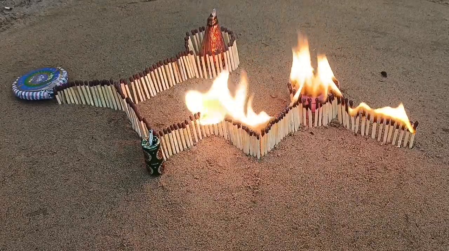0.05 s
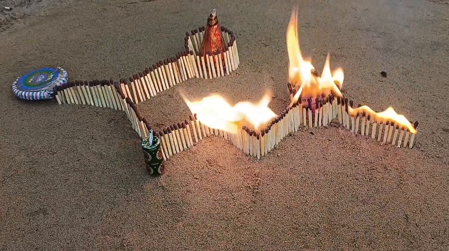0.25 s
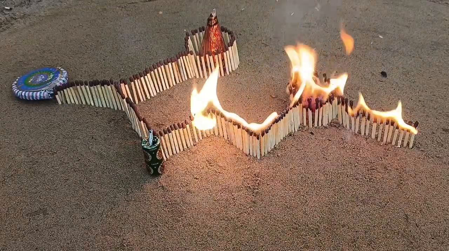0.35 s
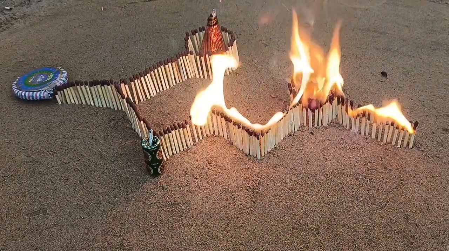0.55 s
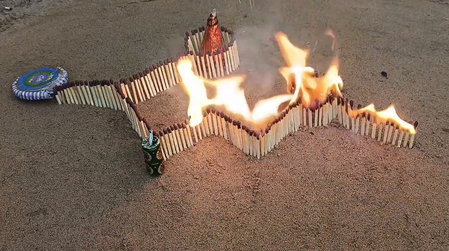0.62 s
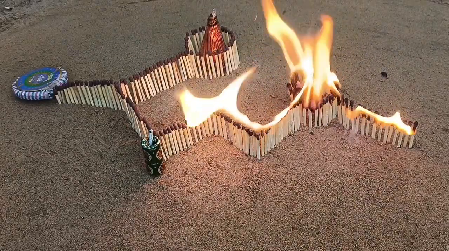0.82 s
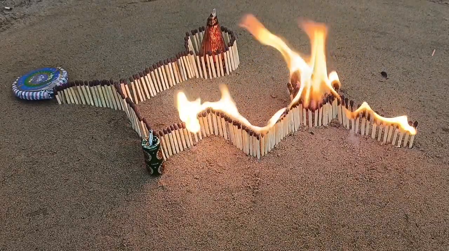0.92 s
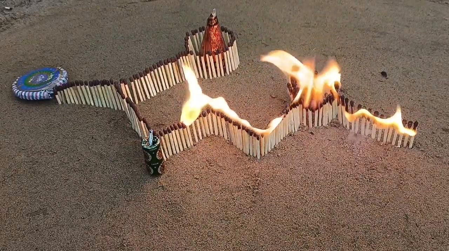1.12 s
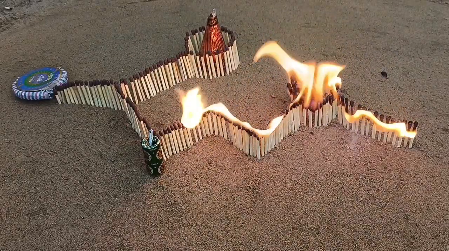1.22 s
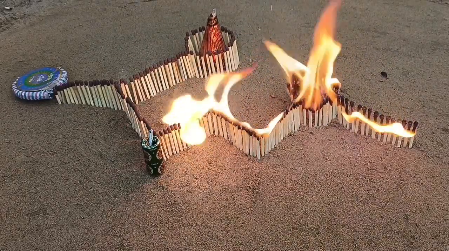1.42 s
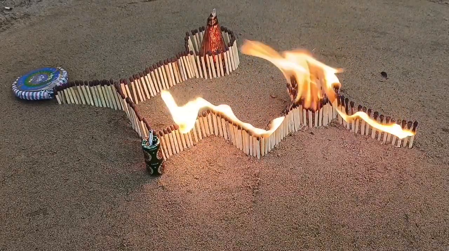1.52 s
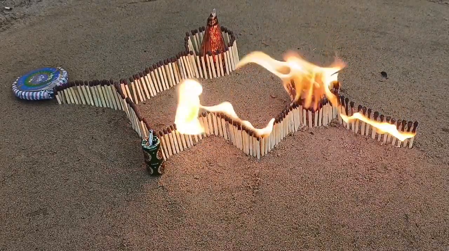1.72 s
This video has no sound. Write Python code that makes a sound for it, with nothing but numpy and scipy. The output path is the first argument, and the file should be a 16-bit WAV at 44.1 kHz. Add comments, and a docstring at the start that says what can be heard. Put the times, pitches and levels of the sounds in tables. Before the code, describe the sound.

Sharp cracking pops from burning matchsticks echo briefly in a yard above quiet flame hiss

```python
"""Rows of matchsticks burn on hard ground in a walled yard, over 1.75 seconds.
From the start, flames flutter (low noise, short puffs) and heads hiss on the right (noise that swells and fades).
Five pops come between 0.2 and 0.7 s: each is a crack with quick reflections, a sizzle, a thump and a low boom.
Each pop also bounces off the ground and sets off noise echoes and hollow tones in the yard.
Faint whistles (wavering tones) come from 0.55 s on; a last pop comes at 1.4 s, then flames and hiss go on."""
import sys
import numpy as np
from scipy import signal
from scipy.fft import rfft, irfft
from scipy.io import wavfile
from scipy.ndimage import uniform_filter1d

SR = 44100
rng = np.random.default_rng(int(sys.argv[2]) if len(sys.argv) > 2 else 0)


def convert_level_to_amplitude(level_db):
    """Map a level in decibels to its linear amplitude factor."""
    exponent = np.asarray(level_db, float) / 20
    return 10 ** exponent


def transcribe(signal):
    """Save signal, clipped to [-1, 1], as a 16-bit WAV file at the path in sys.argv[1]."""
    frames = np.atleast_2d(signal).T
    limited = np.clip(frames, -1, 1)
    pcm = np.round(limited * 32767).astype(np.int16)
    wavfile.write(sys.argv[1], SR, pcm)


N = 77175  # samples in the scene
LEFT_RIGHT = np.array([[1], [-1]])


def sides(pan_db):
    """Gains for left and right that differ by pan_db; a positive pan leans left."""
    return convert_level_to_amplitude(LEFT_RIGHT * pan_db / 2)


def unit(x):
    """Scale to an rms of 1."""
    return x / np.sqrt(np.mean(x ** 2))


def colour(x, points):
    """Filter with the given (Hz, dB) shape; it never sounds ahead of its input and has unit energy."""
    hz_points, db_points = np.array(points, float).T
    hz = np.maximum(np.arange(1025) * SR / 2048, 1)
    log_gain = np.interp(np.log(hz), np.log(hz_points), db_points) * np.log(10) / 20
    # fold the cepstrum forward in time: this gives the minimum-phase filter
    cepstrum = irfft(log_gain)
    cepstrum[1:1024] *= 2
    cepstrum[1025:] = 0
    h = irfft(np.exp(rfft(cepstrum)))[:1024]
    h = h / np.sqrt(np.sum(h ** 2))
    h = h.reshape((1,) * (x.ndim - 1) + (-1,))
    return signal.fftconvolve(x, h, axes=-1)[..., :x.shape[-1]]


def band(x, hz, width_hz):
    """Keep only a band of pitches around hz."""
    edges_hz = [hz - width_hz / 2, min(hz + width_hz / 2, .49 * SR)]
    return signal.sosfilt(signal.butter(2, edges_hz, "band", fs=SR, output="sos"), x)


def walk(rate):
    """A wandering random curve: values held for 1 / rate seconds, then smoothed twice."""
    k = int(SR / rate)
    steps = np.repeat(rng.standard_normal(200), k)[:N]
    return 1.3 * uniform_filter1d(uniform_filter1d(steps, k), k)


def fade(age, t60):
    """Steady dying away, by 60 dB in t60 seconds."""
    return np.exp(-np.log(1000) * age / t60)


def ring(age, hz, t60):
    """A dying sine that starts at age 0."""
    a = np.maximum(age, 0)
    return np.sin(2 * np.pi * hz * a) * fade(a, t60)


def late(x, ms):
    """Delay by ms milliseconds."""
    return np.roll(x, int(ms * SR / 1000), axis=-1)


USUAL_FLARE_DB = -54.5  # treble level that counts as a usual flare
FLUTTER_DB, FLUTTER_HZ, FLUTTER_WIDTH_HZ = -70, 85, 150  # rumble level at a usual flare, before it wanders
FLUTTER_FOLLOWS = .4  # dB of rumble per dB of flare
# puffs of the flames: start_s (the loudest moment), pitch_hz, level_db, length_s (from the peak to 1/e)
PUFFS = [(0.172, 78.6, -54, .025), (.6, 182, -53, 0.0093), (0.793, 85, -53, 0.022),
         (.936, 80.2, -50.5, 0.0077), (1.0, 90, -59, .012), (1.318, 78, -54.5, 0.03),
         (1.535, 79, -47.5, 0.011), (1.592, 95, -52.5, 0.011), (1.61, 105, -55, 0.0052),
         (1.636, 105, -51, 0.0069), (1.718, 99, -52, 0.0097)]
# faint short whistles: start_s (the loudest moment), pitch_hz, level_db, length_s (from the peak to 1/e)
WHISTLES = [(.555, 883, -61, 0.019), (.95, 1398, -68, .03), (1.01, 2356, -69, 0.026),
            (1.095, 1308, -62, 0.027), (1.115, 580, -61, 0.013), (1.3, 1913, -59, 0.016),
            (1.625, 1080, -58, 0.019), (1.655, 1315, -69, 0.026)]


def flutter():
    """Flames: low noise that follows the flare, nearly alike on both sides, with puffs and wavering whistles."""
    t = np.arange(N) / SR
    mid, side = band(rng.standard_normal((2, N)), FLUTTER_HZ, FLUTTER_WIDTH_HZ)
    rumble = unit(mid + .3 * side * LEFT_RIGHT)
    flare_db = np.interp(t, *np.array(FLARE)[:, :2].T)
    rumble_db = FLUTTER_DB + 3.0 * walk(30) + FLUTTER_FOLLOWS * (flare_db - USUAL_FLARE_DB)
    out = convert_level_to_amplitude(rumble_db) * rumble
    for table, waver in ((PUFFS, .4), (WHISTLES, 1.1)):
        for s, hz, db, length in table:
            swell = convert_level_to_amplitude(db + 2 * waver * walk(90)) * np.exp(-((t - s) / length) ** 2)
            out += swell * np.cos(2 * np.pi * hz * (t - s) + waver * walk(90))
    return out


# flaring heads: start_s, treble_db, middle_db (both before a 4.5 dB lift), pan_db (left over right)
FLARE = [(0, -66.5, -74.5, -1), (0.114, -62.5, -71.5, -9), (.19, -67.5, -76, -4), (0.298, -55.5, -62, -5.5),
         (0.359, -58, -51, -3), (.45, -67.5, -100, -7), (0.551, -60, -64, 0), (.63, -57, -75.5, -6),
         (.72, -71.5, -61, -10), (.814, -72, -82, -8), (.856, -57, -68.5, -5), (.886, -57, -68.5, -8),
         (.944, -64, -70, -4), (.988, -61.5, -69, -3.5), (1.09, -73.5, -70, -1),
         (1.116, -65.5, -68.5, -3.5), (1.164, -76.5, -82.5, -4.5), (1.246, -57.5, -67.5, -8.5),
         (1.305, -58.5, -65.5, -7), (1.355, -62, -78, -12), (1.411, -63.5, -66.5, -9),
         (1.472, -52.5, -65, -10), (1.506, -53.5, -47, -6), (1.58, -68.5, -64, -3.5),
         (1.637, -68.5, -75, -10), (1.686, -77.5, -73, -1), (1.72, -70.5, -72, -1.5),
         (1.75, -84, -77, -3.5)]
# tone of the treble hiss: pitch_hz, level_db (per Hz, relative)
TREBLE = [(2590, -46), (4400, -24), (5010, -1.5), (5550, -1), (6150, -6.5), (8780, -6.5), (9530, -13.5),
          (10800, -13.5), (11700, -5), (12300, -9), (14900, -20.5), (15400, -24.5), (16000, -29)]
# tone of the middle hiss: pitch_hz, level_db (per Hz, relative)
MIDDLE = [(120, -39.5), (200, -18), (363, -13), (710, -16), (1470, -8.5), (1670, -17.5), (1920, -8),
          (2910, -10), (3350, -29), (3670, -12), (4400, -43), (5720, -41.5), (9680, -120)]
# slow and quick wavering heard in narrow bands, each (treble dB, middle dB) per unit of walk()
SLOW_WAVER_DB, QUICK_WAVER_DB = (.8, 2.5), (1.5, 2.5)
SLOW_PER_S, QUICK_PER_S = 13, 80
BRIGHTEN, BRIGHT_HZ = .4, 9100  # dB per octave above BRIGHT_HZ for each dB over the usual flare


def flare():
    """Hiss of igniting heads: noise swells and fades, brighter on top when strong; narrow bands waver in it."""
    t, out = np.arange(N) / SR, 0
    start_s, treble_db, middle_db, pan_db = np.array(FLARE, float).T
    for points, levels, slow_db, quick_db in ((TREBLE, treble_db, SLOW_WAVER_DB[0], QUICK_WAVER_DB[0]),
                                              (MIDDLE, middle_db, SLOW_WAVER_DB[1], QUICK_WAVER_DB[1])):
        noise = colour(rng.standard_normal((2, N)), points)
        db = np.interp(t, start_s, levels)
        low_hz, high_hz = points[1][0], points[-2][0]
        layer = 0
        for hz in low_hz * 2 ** np.arange(0, np.log2(high_hz / low_hz), 1 / 8):
            waver = slow_db * walk(SLOW_PER_S) + quick_db * walk(QUICK_PER_S)
            brighter = BRIGHTEN * (db - USUAL_FLARE_DB) * max(np.log2(hz / BRIGHT_HZ), 0)
            layer = layer + band(noise, hz, hz / 10.3) * convert_level_to_amplitude(waver + brighter)
        out = out + unit(layer) * convert_level_to_amplitude(db + 4.5)
    return out * sides(np.interp(t, start_s, pan_db))


# yard echoes by band: pitch_hz, level_db (relative), t60_s (time to fade by 60 dB)
YARD = [(70, -29, 0.3), (190, -20.5, .27), (400, -8, .2), (620, -12.5, 0.1), (810, -21, 0.21),
        (1190, -13, 0.13), (1610, -14.5, 0.27), (2300, -5, 0.08), (3780, -15.5, 0.18), (5200, -17, 0.14),
        (9000, -11, 0.28), (15000, -23.5, .15)]
# hollow tones of the yard: pitch_hz, level_db (before scatter and the hold), t60_s (time to fade by 60 dB)
HOLLOWS = [(76, -62.5, 0.39), (101.25, -63.5, 0.32), (136.4, -65, .25), (187.6, -62.5, 0.12),
           (253.6, -54.5, .2), (297.8, -46.5, 0.17), (360.4, -49, 0.15), (430.2, -57, 0.14),
           (484, -47.5, 0.16), (544, -56, 0.18), (640, -60.5, 0.073)]
WALLS_S, SETTLE_S, EARLY_DB = .034, .014, 2.5  # fading starts; early extra level goes SETTLE_S before that
HOLLOW_SCATTER_DB, HOLLOW_RISE_S, HOLLOW_HOLD_S = -1, 0.0033, .025  # tones hold before they fade


def yard(x, start):
    """Dense noise echoes, stronger early, die band by band once the walls answer; hollow tones ring on."""
    t = np.arange(SR // 2) / SR
    band_hz, band_db, band_t60 = np.array(YARD, float).T
    settled = 1 / (1 + np.exp(-(t - WALLS_S + SETTLE_S) / (SETTLE_S / 3)))
    early = convert_level_to_amplitude(EARLY_DB) + (1 - convert_level_to_amplitude(EARLY_DB)) * settled
    echo = 0
    for hz in 60 * 2 ** np.arange(0, 8.1, 1 / 3):
        db = np.interp(np.log(hz), np.log(band_hz), band_db)
        t60 = np.interp(np.log(hz), np.log(band_hz), band_t60)
        mid, side = band(rng.standard_normal((2, len(t))), hz, hz / 4.3)
        pair = mid + min(hz / 1600.0, 1.2) * side * LEFT_RIGHT  # high echoes spread wider
        echo = echo + convert_level_to_amplitude(db) * pair * fade(np.maximum(t - WALLS_S, 0), t60)
    echo = echo * early * np.minimum(t / 0.0037, 1) ** 2 / np.sqrt(SR * WALLS_S)
    for (hz, db, t60), c in zip(HOLLOWS, rng.standard_normal((len(HOLLOWS), 3))):
        lag = .003 + (abs(c[0]) + .04 * c[1] * LEFT_RIGHT) / hz
        tone = convert_level_to_amplitude(db + HOLLOW_SCATTER_DB * c[2]) * ring(t - lag, hz, t60)
        # undo the fade during the hold, at the level of its middle
        hold = convert_level_to_amplitude(60 * (np.minimum(t, HOLLOW_HOLD_S) - HOLLOW_HOLD_S / 2) / t60)
        echo = echo + tone * (1 - np.exp(-t / HOLLOW_RISE_S)) * hold
    tail = signal.fftconvolve(x.mean(0)[None, start:start + SR // 8], echo, axes=-1)
    return np.pad(tail, ((0, 0), (start, N)))[:, :N]


# the first crack of a pop and its quick reflections: late_ms (before jitter), level_db (added to crack_db),
# pan_db (left over right, added to the pop's pan, before scatter)
ARRIVALS = [(0, 0.5, 12), (.6, -0.5, 7.5), (1.3, -3, 3.5), (2.0, 4.5, -5), (2.5, -8, -20), (2.9, 1, 10),
            (3.5, -1, -8.5)]
# tone of the crack and its reflections: pitch_hz, level_db (per Hz, relative)
CRACK_COLOUR = [(350, -44.5), (600, -0.5), (1260, -7), (2120, 1.5), (2990, -2.5), (4050, -2.5),
                (6920, -12.5), (7940, -17.5), (12300, -23), (13600, -40.5), (14900, -22.5), (16000, -39)]
CRACK_JITTER_MS, CRACK_T60_S, FIZZ_DB = 0.11, 0.0049, -7.5  # fizz is the noise after each click


def crack(s, crack_db, fade_db, pan_db):
    """A first crack and its quick reflections over 3.5 ms, each a click followed by dying noise."""
    arrivals = np.zeros((2, N))
    chance = rng.standard_normal((len(ARRIVALS), 2))
    chance[0] = 0  # the first crack is exactly on time and in place
    for (ms, db, lean_db), (jitter, lean_scatter) in zip(ARRIVALS, chance):
        fizz = rng.standard_normal(400) + .5 * rng.standard_normal((2, 400))
        click = fizz * convert_level_to_amplitude(FIZZ_DB) * fade(np.arange(400) / SR, CRACK_T60_S)
        click[:, 0] = 1
        i = int((s + (ms + CRACK_JITTER_MS * jitter) / 1000) * SR)
        size = convert_level_to_amplitude(crack_db + db + fade_db * ms)
        arrivals[:, i:i + 400] += sides(pan_db + lean_db + 2.5 * lean_scatter) * size * click
    return colour(arrivals, CRACK_COLOUR)


THUMP_CYCLES = 1.43  # cycles in which the thump fades by 30 dB
BOOM_HZ, BOOM_T60_S = 96.8, 0.05
GROUND_MS, GROUND_DB, SIDE_MS, SIDE_DB = 1.9, -7, 3.086, -6.5  # bounce off the ground; off something on the right
SIZZLE_HZ, SIZZLE_WIDTH_HZ, SIZZLE_S = 12850, 4300, 0.0052  # a spit of gas at the very top
# pops: start_s, crack_db, crack_fade_db_per_ms (added per ms late), sizzle_db, thump_db, thump_hz,
# boom_db, pan_db (left over right), sent_db (crack sent to the yard)
POPS = [(0.2259, -9.5, -3.5, -32.5, -11, 378, -17, -7, -0.5),
        (0.259, -9.5, -3.5, -28, -1.5, 530, -18.5, -1, -0.5),
        (.3860, -14.5, -1, -31, -15, 400, -17.5, -2.5, -3.5),
        (0.4723, -10.5, -1.96, -35, -13.5, 400, -19, -6.5, 3),
        (0.6674, -12, 1.4, -35, -10.5, 330, -13.5, -5, 6),
        (1.4336, -14, -4, -32, -2.5, 540, -17.5, -1, -5.5)]


def pops():
    """A crack, a sizzle, a thump with two bounces, and a boom that pulls inward first; the yard echoes them."""
    t, out = np.arange(N) / SR, 0
    spit = rng.standard_normal(N) + .45 * rng.standard_normal((2, N))
    spit = unit(band(spit, SIZZLE_HZ, SIZZLE_WIDTH_HZ))
    for s, crack_db, fade_db, sizzle_db, thump_db, hz, boom_db, pan_db, sent_db in POPS:
        thump = convert_level_to_amplitude(thump_db) * ring(t - s, hz, 2 * THUMP_CYCLES / hz)
        thump = thump + convert_level_to_amplitude(GROUND_DB) * late(thump, GROUND_MS)
        thump = thump + convert_level_to_amplitude(SIDE_DB) * late(thump, SIDE_MS) * np.array([[0], [1]])
        sizzle = convert_level_to_amplitude(sizzle_db) * spit * (t > s) * np.exp(-((t - s) / SIZZLE_S) ** 4)
        boom = -convert_level_to_amplitude(boom_db) * ring(t - s, BOOM_HZ, BOOM_T60_S)  # minus: inward first
        body = sides(pan_db) * (thump + sizzle + boom)
        start = int(s * SR)
        sent = convert_level_to_amplitude(sent_db) * colour(signal.unit_impulse(N, start), CRACK_COLOUR)
        out = out + crack(s, crack_db, fade_db, pan_db) + body + yard(sent + body, start)
    return out


def scene():
    """Flutter and hiss, with the pops and their echoes on top."""
    return flutter() + flare() + pops()


def low_pass(x):
    """Removes everything above the highest recorded frequency."""
    return signal.sosfilt(signal.butter(12, 16810, fs=SR, output="sos"), x)


def record(dry):
    """The microphone loses the deepest bass, below about 45 Hz."""
    mix = signal.sosfilt(signal.butter(1, 45., "high", fs=SR, output="sos"), dry)
    return low_pass(mix)


dry = scene()
out = record(dry)
transcribe(out)
```